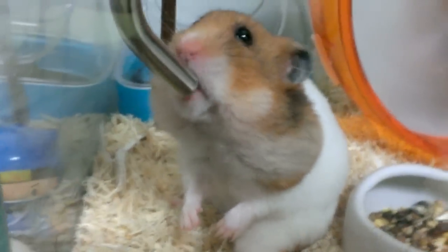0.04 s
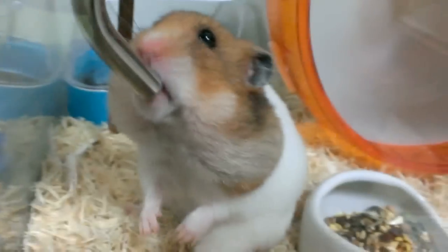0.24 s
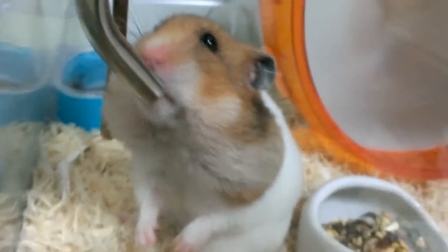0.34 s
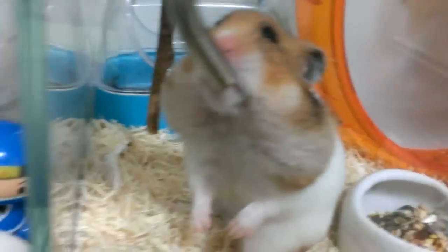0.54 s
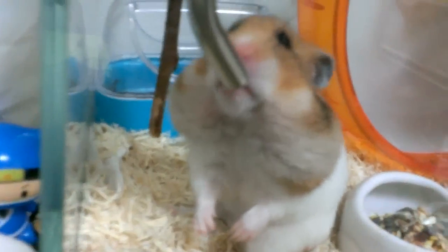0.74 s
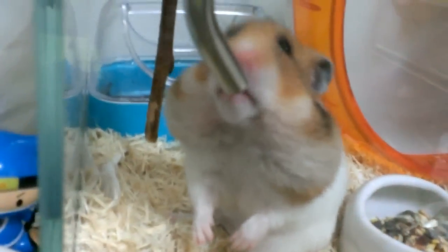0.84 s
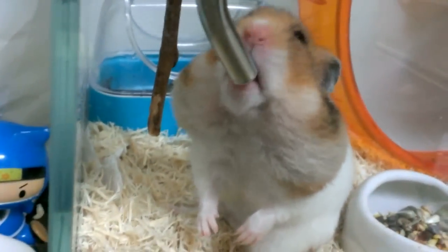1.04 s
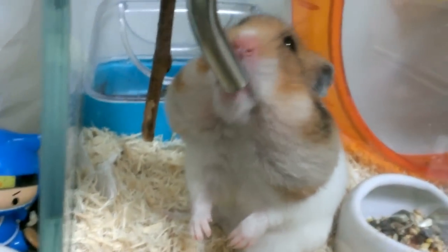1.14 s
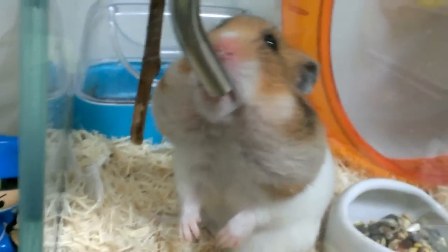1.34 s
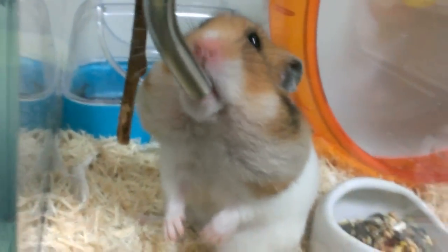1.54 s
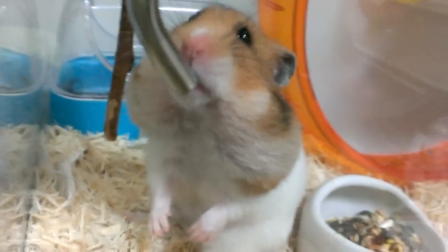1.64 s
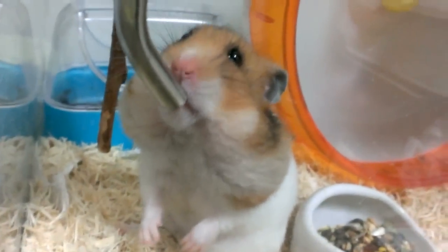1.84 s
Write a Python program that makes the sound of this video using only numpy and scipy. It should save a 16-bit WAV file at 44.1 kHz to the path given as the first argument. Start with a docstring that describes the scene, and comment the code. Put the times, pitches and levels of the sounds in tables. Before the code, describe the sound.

Sharp knocks and rattles come from a hamster at a metal water spout, briefly ringing its glass tank, some with a low thump. Weaker taps and light rubbing follow, heard close up in a small, quiet room.

```python
"""Knocks on a glass tank

Close up at a glass tank in a small, quiet room, on a stereo recorder. Sharp knocks and rattles, likely
the recorder bumping the glass and fingers on its case: each contact cracks, rings the tank and dies in
the room, and the heavier ones add a low thump. Weak taps follow, with light rubbing,
two faint high chirps and a thin scrape."""
import sys
import numpy as np
from scipy import signal
from scipy.fft import rfft, irfft, next_fast_len
from scipy.io import wavfile
from scipy.ndimage import uniform_filter1d

SR = 44100
rng = np.random.default_rng(int(sys.argv[2]) if len(sys.argv) > 2 else 0)


def digitize_waveform(pressure):
    """Quantize a signal to 16-bit integers and store it at the path in sys.argv[1].

    Rows of a 2-D input are taken as channels; values are limited to [-1, 1].
    """
    field = np.atleast_2d(pressure).T
    bounded = np.clip(field, -1, 1)
    quanta = np.round(bounded * 32767).astype(np.int16)
    wavfile.write(sys.argv[1], SR, quanta)


N = 83790


def undb(db):
    """Decibels to gain."""
    return 10 ** (np.asarray(db) / 20)


def unit(x):
    """Scale to rms 1."""
    return x / np.sqrt(np.mean(x ** 2))


def colour(x, points):
    """Minimum-phase filter through (freq_hz, gain_db) points."""
    size = next_fast_len(2 * x.shape[-1], real=True) // 2 * 2
    hz, db = np.array(points, float).T
    freqs = np.maximum(np.fft.rfftfreq(size, 1 / SR), 1)
    gain = undb(np.interp(np.log(freqs), np.log(hz), db))
    cepstrum = irfft(np.log(gain))
    cepstrum[1:size // 2] *= 2
    cepstrum[size // 2 + 1:] = 0
    return irfft(rfft(x, size) * np.exp(rfft(cepstrum)))[..., :x.shape[-1]]


def highpass(x, hz):
    """Gentle first-order low cut."""
    return signal.lfilter(*signal.butter(1, hz, "high", fs=SR), x)


def fade(t, rise_s, t60_s):
    """Quick rise, exponential decay."""
    return (1 - np.exp(-t / rise_s)) * np.exp(-np.log(1000) * t / t60_s)


def burst(envelope):
    """Noise under an envelope, with an even spectrum and unit energy."""
    noise = rng.standard_normal(len(envelope))
    for _ in range(3):
        power = uniform_filter1d(np.abs(rfft(noise * envelope)) ** 2, size=160)
        noise = unit(irfft(rfft(noise) / np.sqrt(power), len(noise)))
    sound = noise * envelope
    return sound / np.sqrt(np.sum(sound ** 2))


def level_curve(points):
    """Gain over the scene through (time_s, level_db) points."""
    times, db = np.array(points).T
    return undb(np.interp(np.arange(N) / SR, times, db))


def add(out, start_s, sound):
    """Mix a sound in at its start time."""
    i = max(int(start_s * SR), 0)
    out[..., i:i + sound.shape[-1]] += sound[..., :N - i]


def left_first(x, lag_s=0.00037):
    """Mono to stereo: a sound reaches the right microphone just after the left."""
    i = np.arange(len(x))
    return np.array([x, np.interp(i - np.round(lag_s * SR), i, x, left=0)])


# Spectrum of the quiet room around the tank: freq_hz, level_db
ROOM_TONE_SPECTRUM = [(25, -14.5), (50, -23), (75, -14.5), (110, -5.5), (160, 1), (230, -5), (400, -7),
                      (700, -12), (1000, -10.5), (1600, -19), (2600, -17.5), (4500, -23), (8000, -27),
                      (10400, -33.5)]


def room_tone(level_db=-66, shared_below_hz=600):
    """The room's rumble is the same at both microphones; its hiss differs at each."""
    noise = rng.standard_normal((3, N))
    share = 1 / (1 + (np.fft.rfftfreq(N, 1 / SR) / shared_below_hz) ** 2)
    rumble = np.sqrt(share) * rfft(noise[0])
    hiss = np.sqrt(1 - share) * rfft(noise[1:])
    return undb(level_db) * unit(colour(irfft(rumble + hiss, N), ROOM_TONE_SPECTRUM))


# Light rubbing near the microphones: time_s, level_db
RUB_LEVELS = [(0, -69.5), (.03, -59), (.09, -76.5), (.19, -73.5), (.33, -52), (.5, -71.5), (.57, -67.5),
              (.63, -72.5), (.78, -63.5), (.97, -67), (1.1, -59.5), (1.2, -65), (1.37, -65), (1.5, -74),
              (1.73, -87), (1.815, -57.5), (1.85, -65.5), (1.9, -63.5)]
# Its dull tone: freq_hz, gain_db
RUB_SPECTRUM = [(40, -17.5), (75, 6.5), (140, 18.5), (330, 12.5), (600, 9), (950, 2.5), (1500, 7),
                (2600, -2), (4000, -2.5), (6500, -14), (9500, -15)]


def rubbing(grain_db=2):
    """Fine, uneven friction grains come and go between the knocks."""
    grain = undb(grain_db * unit(uniform_filter1d(rng.standard_normal(N), size=120)))
    grit = unit(colour(grain * rng.standard_normal(N), RUB_SPECTRUM))
    return left_first(grit * level_curve(RUB_LEVELS))


# Resonances of the glass tank: freq_hz, gain_db, t60_s (before the cap)
TANK_MODES = [(180.3, 11, .16), (290.4, 3.5, 0.15), (325, -1, .14), (415.7, 7, .16), (555.4, -2, .14),
              (618.6, 7, 0.066), (763, 4, 0.16), (973, 0, .09), (1255, -1, 0.04), (1517, -1, .14),
              (1973, 2, 0.26), (2177, -5, .11), (2760, 1.5, 0.12), (3104, 4.5, .11)]


def tank_ring(t, t60_cap_s=0.2):
    """Struck once, the tank rings as a sum of dying sines."""
    ring = np.zeros(len(t))
    for hz, db, t60_s in TANK_MODES:
        rate = np.log(1000) / min(t60_s, t60_cap_s)
        ring += 2 * rate / SR * undb(db) * np.exp(-rate * t) * np.sin(2 * np.pi * hz * t)
    return ring


# Close knocks, likely handling noise, with four band gains and the resonance of the struck spot:
# start_s, contact_ms, hollow_db, body_db, clack_db, tick_db, spot_hz, spot_boost_db
CLOSE_KNOCKS = [(0.2138, 6.3, -54, -41.5, -48, -58.5, 2300, 5),
                (0.2346, 27, -49, -35, -35.5, -45.5, 2600, 11.5),
                (0.239, 3.6, -41, -50, -34, -45, 2110, 10.5),
                (0.2554, 4, -40.5, -25.5, -23.5, -36, 2094, 0.5),
                (.317, 2.6, -68, -49.5, -49, -60.5, 2780, 8),
                (0.379, 3.4, -36.5, -30, -20.5, -39.5, 3700, 10.5),
                (.390, 5.2, -47, -31, -68, -82, 740, 12), (0.4106, 1.3, -35, -30, -39.5, -62, 700, -2),
                (0.4201, 2.7, -46, -38, -56, -72, 786, 6), (0.445, 1.9, -43.5, -63, -67, -71, 634, -6),
                (0.549, 36, -62, -64, -58.5, -70, 1016, 20.5),
                (0.6502, 2.9, -49.5, -45, -57.5, -67, 2250, 19), (.657, 3.5, -48, -73, -51.5, -70, 2350, 8),
                (0.7061, 4, -40, -39.5, -46.5, -58, 3030, 8.5),
                (0.728, 4.2, -36.5, -34.5, -42.5, -59, 2180, 5.5),
                (.7365, 1.8, -36.5, -40.5, -49, -64, 600, 0), (.766, 3.5, -52, -46, -47, -64, 3600, 16),
                (0.7916, 5.5, -46, -47, -55.5, -69.5, 3630, 20), (.807, 4.9, -48.5, -55, -53, -73, 800, 0),
                (.844, 8.7, -50, -51, -49, -68.5, 5210, 14.5),
                (0.8891, 1.66, -28.5, -31, -39, -53.5, 283, 10),
                (0.8999, 3.8, -29.5, -42, -48.5, -106, 2130, 19.5),
                (1.066, 2.1, -73.5, -82, -54.5, -63, 2530, 3), (1.114, 7, -54, -60.5, -47, -69, 2290, 0),
                (1.1225, 5.5, -44, -36.5, -47.5, -66, 5400, 10),
                (1.18, 1.3, -53.5, -51, -67, -73, 3100, 15),
                (1.227, 4.7, -46.5, -54.5, -62, -75, 2100, 13.5),
                (1.257, 24, -47.5, -54, -63, -67.5, 2067, 10), (1.31, 6.3, -47.5, -58.5, -63, -79, 1900, 7),
                (1.348, 30, -53.5, -62, -61, -82, 1000, 14)]
BAND_CENTRES_HZ = [300, 800, 2500, 8000]  # hollow, body, clack, tick
# Tone common to all the knocks: freq_hz, gain_db
KNOCK_SPECTRUM = [(40, -39), (90, -1.5), (170, -0.5), (300, 2.5), (480, -2), (790, -1.5), (990, -4.5),
                  (1150, -6), (1550, -8), (2200, -13), (3000, -8.5), (3600, -13.5), (5500, -17.5),
                  (7500, -18.5), (10200, -19.5)]


def knocks(gain_db=38.5, push_s=0.00036, spot_width_oct=0.29):
    """Each contact is a smooth push with bright chatter; the tank rings on and the room answers."""
    out, t = np.zeros((2, N)), np.arange(SR // 2) / SR
    modes = tank_ring(t)
    push = undb(-4) * t / push_s ** 2 / SR * np.exp(-t / push_s)
    ring_fade = fade(t, rise_s=0.0016, t60_s=0.1)
    room_fade = fade(t, rise_s=0.0016, t60_s=0.23)
    freqs = np.geomspace(100, 11000, 160)
    for start_s, contact_ms, *band_db, spot_hz, spot_boost_db in CLOSE_KNOCKS:
        contact = (1 - np.exp(-t / 0.0006)) * np.exp(-(1000 * t / contact_ms) ** 2)
        chatter = highpass(burst(contact), hz=590)
        spot_db = spot_boost_db / (1 + (2 * np.log2(freqs / spot_hz) / spot_width_oct) ** 2)
        crack = colour(push + chatter, list(zip(freqs, spot_db)))
        dense_ring = undb(-5) * highpass(burst(ring_fade), hz=260)
        direct = left_first(crack + modes + dense_ring)
        # Scattered treble and reverberation differ at each microphone.
        scatter = highpass([burst(ring_fade) for _ in range(2)], hz=880)
        reverb = undb(-16) * np.array([burst(room_fade) for _ in range(2)])
        add(out, start_s, colour(direct + scatter + reverb, list(zip(BAND_CENTRES_HZ, band_db))))
    return undb(gain_db) * colour(out, KNOCK_SPECTRUM)


# Low thumps, probably the recorder against the glass: start_s, level_db, mid_pitch_hz, t60_s
GLASS_THUMPS = [(0.2456, -28.5, 108.3, .15), (0.382, -28.5, 121.8, 0.16), (.5, -56.5, 109, 0.2),
                (0.651, -37, 112.6, .13), (0.728, -37.5, 160, 0.16), (0.8932, -22, 122.5, .11),
                (0.999, -49, 100.6, 0.13), (1.083, -43, 131, .2), (1.1239, -26, 135, .1),
                (1.183, -28.5, 134, 0.12), (1.237, -30.5, 142, 0.065), (1.264, -30.5, 148.6, 0.091),
                (1.31, -38.5, 153.3, 0.11), (1.384, -48.5, 124.2, 0.1), (1.836, -50, 108, 0.066)]


def thumps(rise_s=0.005, pitch_sag=0.094):
    """A low mode swings up smoothly and dies away, dropping in pitch as the pressure eases."""
    out, t = np.zeros(N), np.arange(SR // 2) / SR
    for start_s, db, mid_hz, t60_s in GLASS_THUMPS:
        rise = 1 - np.exp(-(t / rise_s) ** 2)
        decay = np.exp(-np.log(1000) * t / t60_s)
        hz = mid_hz * (1 + pitch_sag * (2 * decay - 1))
        add(out, start_s, -undb(db) * rise * decay * np.sin(2 * np.pi * np.cumsum(hz) / SR))
    return left_first(out)


# Pitched part of the hardest hits, close up: start_s, level_db, pitch_hz, length_s
HARD_CLACKS = [(0.2558, -24, 770, 0.017), (0.2556, -22, 980, 0.0088), (.2562, -25, 2990, .005),
               (.3793, -13.5, 2843, 0.0041), (.3794, -21.5, 2246, 0.0039), (0.3784, -17.5, 950, 0.0043),
               (0.378, -35, 6010, 0.0053), (0.6502, -37, 703, 0.0039), (0.707, -32, 330, .007),
               (.7662, -36.5, 740, 0.0065), (.7675, -42.5, 3750, 0.0042), (0.7946, -47, 3670, 0.0037)]


def clacks(rise_s=0.00089):
    """Short, hard buzzes start at once and stop as the surfaces part."""
    out = np.zeros(N)
    for start_s, db, hz, length_s in HARD_CLACKS:
        t = np.arange(int(length_s * SR)) / SR
        envelope = (1 - np.exp(-t / rise_s)) * np.cos(np.pi / 2 * t / length_s)
        add(out, start_s, undb(db) * envelope * np.sin(2 * np.pi * hz * t))
    return left_first(out)


# Faint chirps, centred between the microphones: start_s, length_s, level_db
FAINT_CHIRPS = [(0.971, 0.056, -71), (1.563, 0.055, -71.5)]


def chirps(settled_hz=5240, fall_hz=300, fall_s=0.0162, waver_hz=35):
    """Thin whistles fall and settle, wavering a little."""
    out = np.zeros(N)
    for start_s, length_s, db in FAINT_CHIRPS:
        t = np.arange(int(length_s * SR)) / SR
        waver = unit(uniform_filter1d(rng.standard_normal(N), size=150))[:len(t)]
        hz = settled_hz + fall_hz * np.exp(-t / fall_s) + waver_hz * waver
        envelope = np.sin(np.pi * t / length_s)
        add(out, start_s, undb(db) * envelope * np.sin(2 * np.pi * np.cumsum(hz) / SR))
    return np.array([out, out])


# A thin, close scrape within the last of the rubbing: time_s, level_db
SCRAPE_LEVELS = [(1.659, -101), (1.691, -77), (1.748, -86), (1.801, -62.5), (1.84, -74), (1.9, -79)]


def scrape(pitches_hz=(2451, 2770), width_hz=90):
    """Friction holds two narrow resonances for a moment."""
    resonances = [signal.iirpeak(hz, hz / width_hz, SR) for hz in pitches_hz]
    ring = sum(signal.lfilter(b, a, rng.standard_normal(N)) for b, a in resonances)
    return left_first(unit(ring) * level_curve(SCRAPE_LEVELS))


# Balance of close sounds at the two microphone ports: freq_hz, left_minus_right_db
PORT_BALANCE = [(100, 1.5), (200, .5), (340, 2), (800, 0.44), (1050, -1.5), (1400, -6.5), (2100, -9),
                (3300, -1.5), (4500, 3), (6000, 12.5), (9000, 21.5)]


def microphone_ports(pair):
    """Each port gives close sounds its own colour."""
    left = colour(pair[0], [(hz, db / 2) for hz, db in PORT_BALANCE])
    right = colour(pair[1], [(hz, -db / 2) for hz, db in PORT_BALANCE])
    return np.array([left, right])


def scene():
    """Contacts right by the microphones, thin in the deep bass, with chirps over the room tone."""
    close = microphone_ports(knocks() + clacks() + thumps() + rubbing() + scrape())
    low_cut = signal.butter(2, 55, "high", fs=SR, output="sos")
    return signal.sosfilt(low_cut, close) + chirps() + room_tone()


def record(dry):
    """The recorder cuts the treble steeply above 10450 Hz."""
    return signal.sosfilt(signal.ellip(10, 0.2, 70, 10450, fs=SR, output="sos"), dry)


dry = scene()
out = record(dry)
digitize_waveform(out)
```